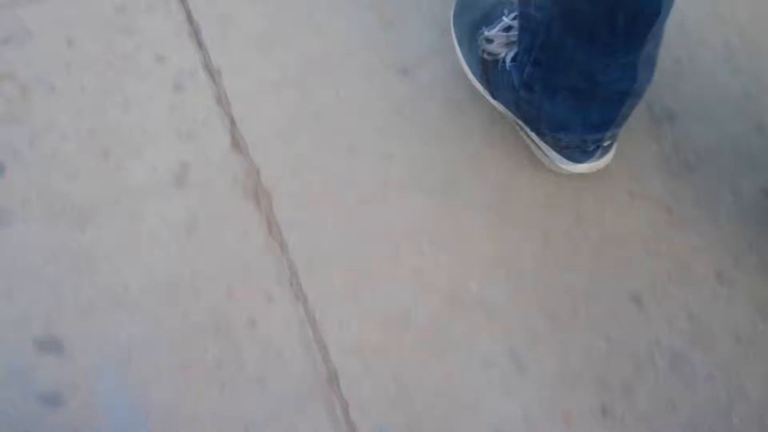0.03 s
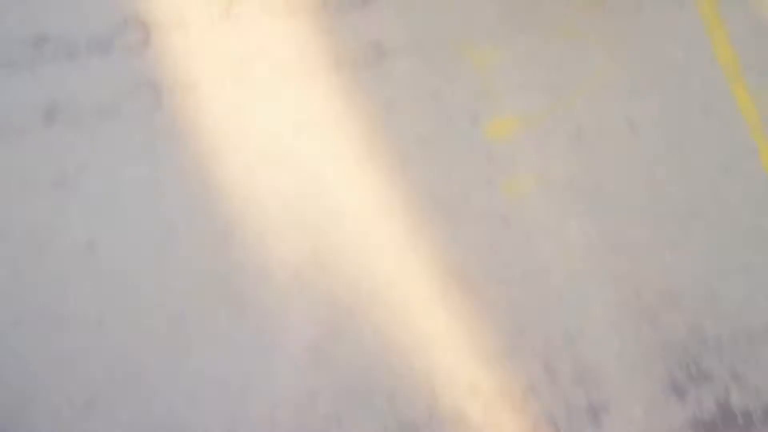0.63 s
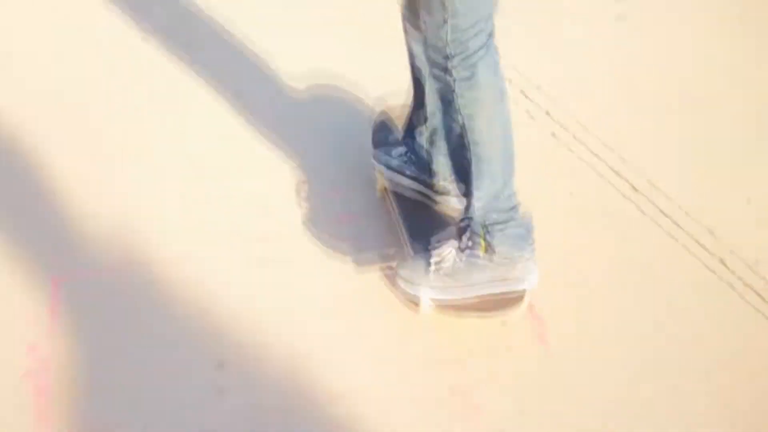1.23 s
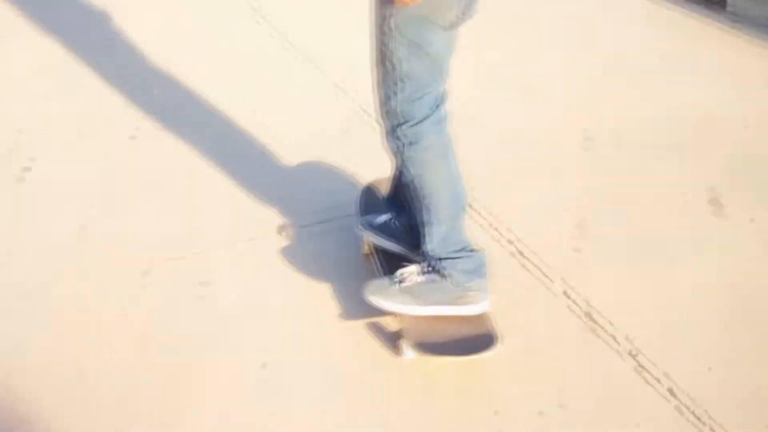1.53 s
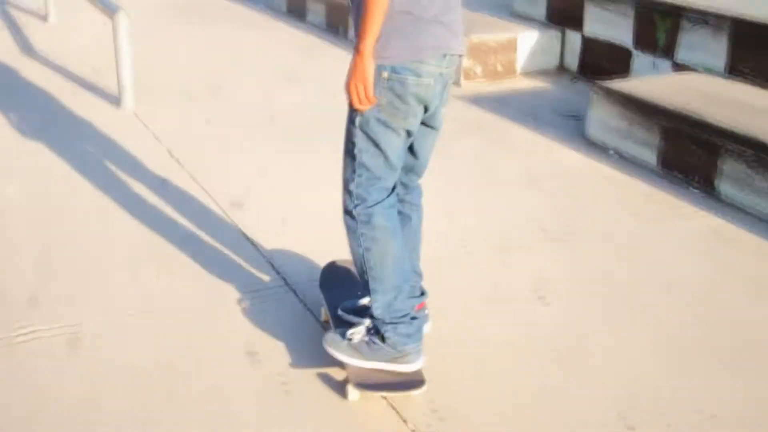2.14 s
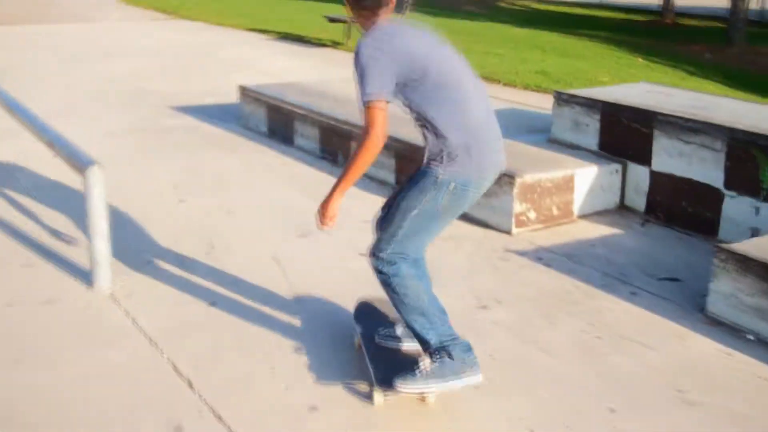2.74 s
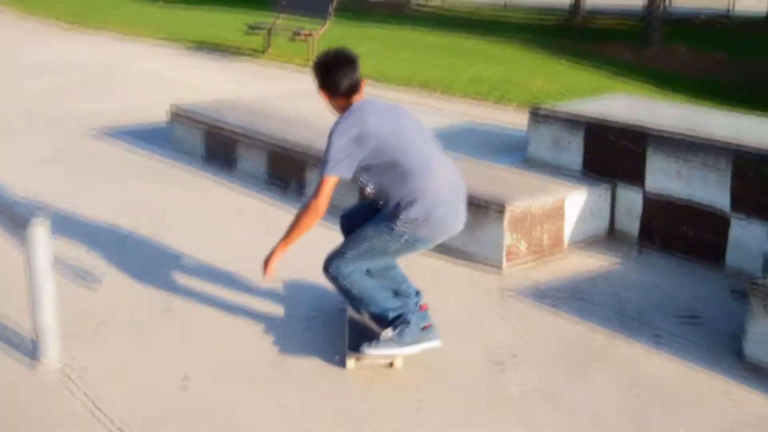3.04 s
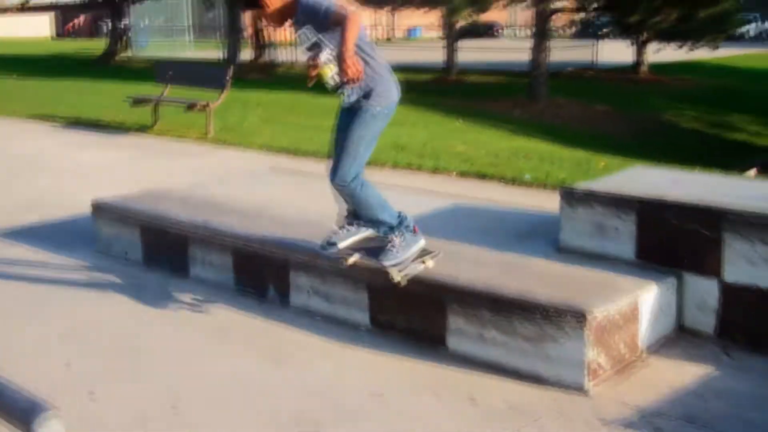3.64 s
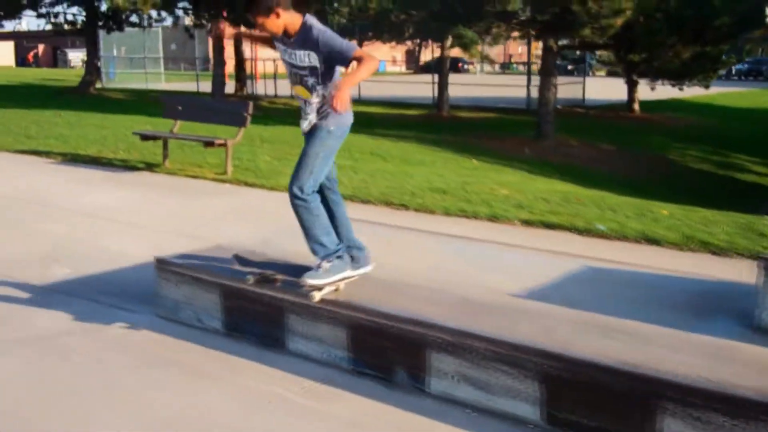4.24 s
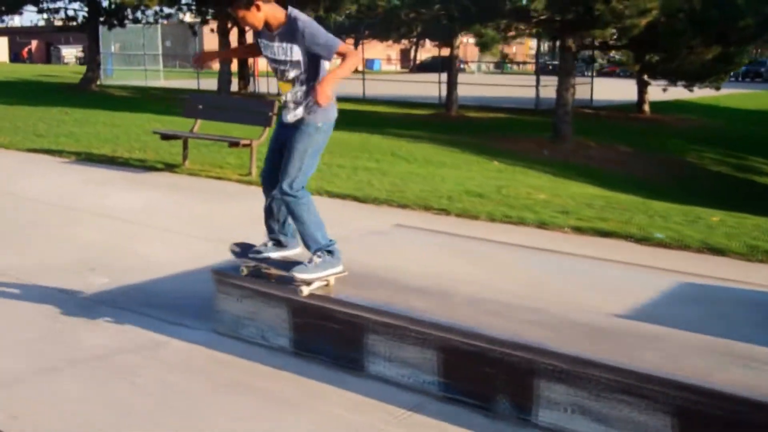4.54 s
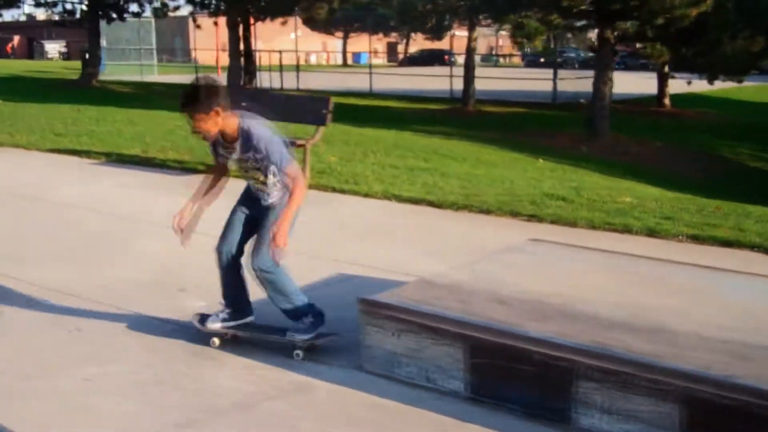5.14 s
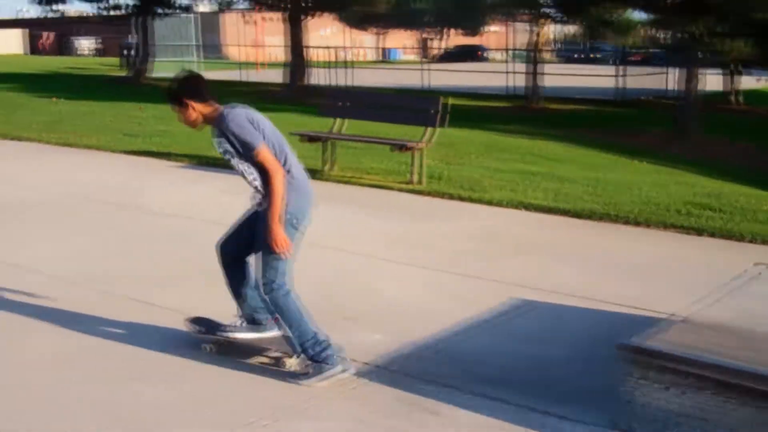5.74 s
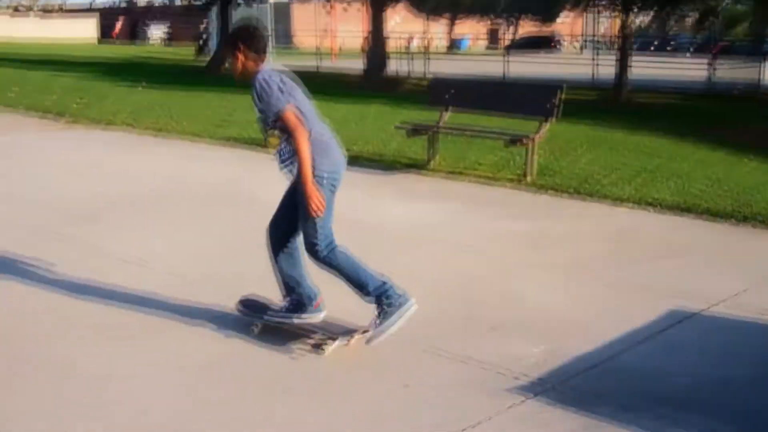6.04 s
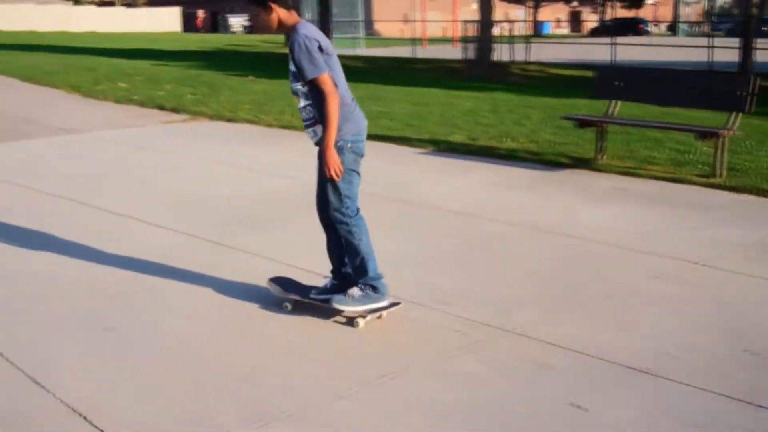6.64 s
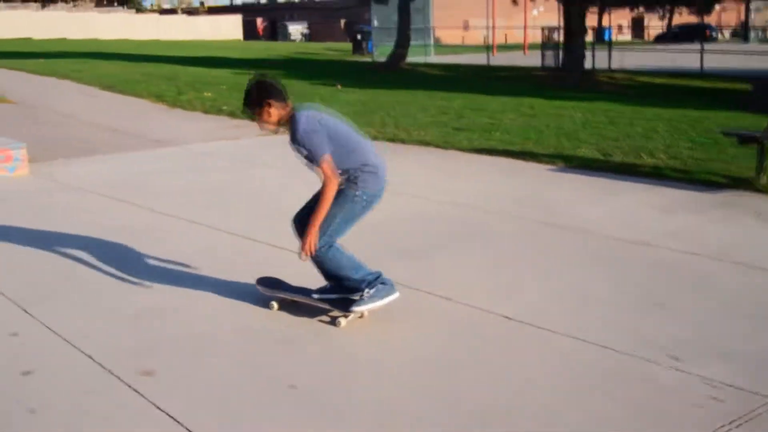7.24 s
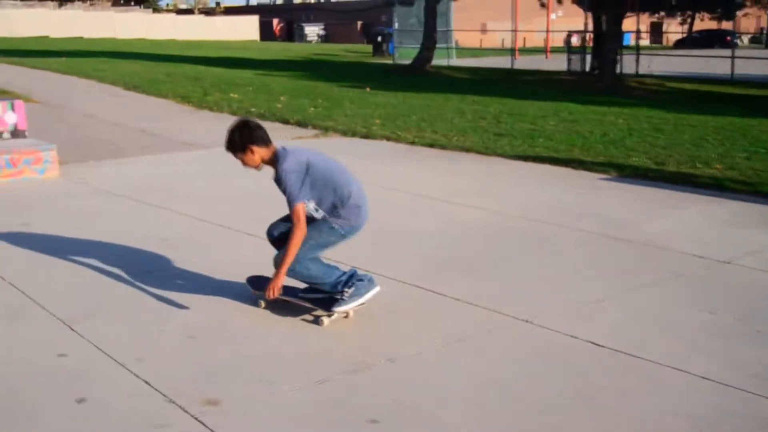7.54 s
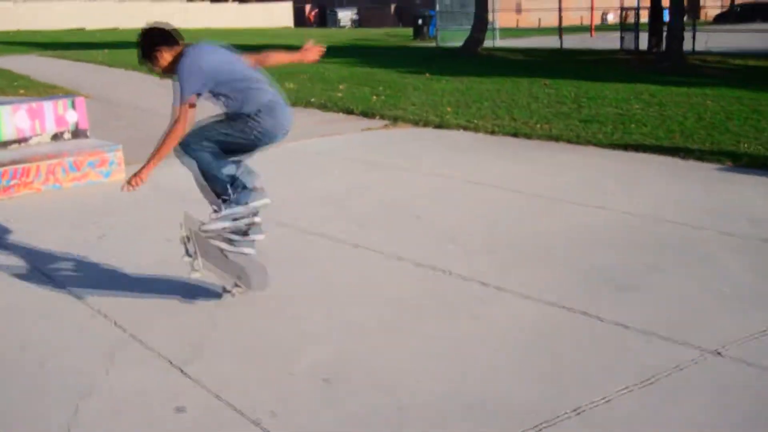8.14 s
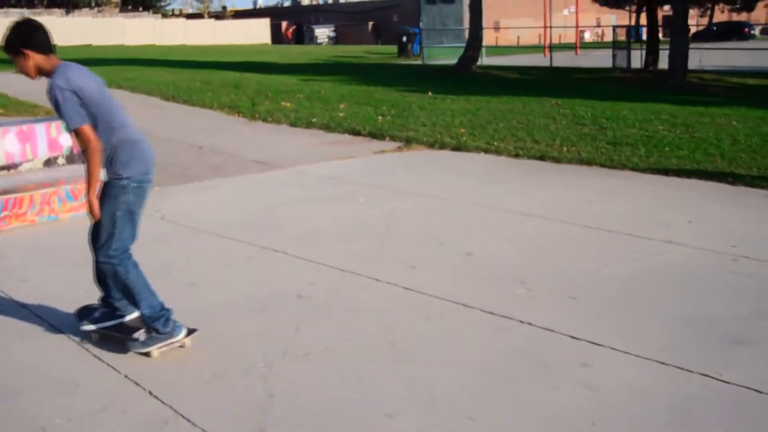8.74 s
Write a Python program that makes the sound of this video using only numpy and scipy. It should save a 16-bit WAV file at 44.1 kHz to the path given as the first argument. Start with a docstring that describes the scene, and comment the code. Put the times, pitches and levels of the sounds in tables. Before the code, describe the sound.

A skateboard clatters down onto concrete and rolls off with a hollow, gritty rumble, clicking over joints. It pops and smacks onto a ledge, the metal trucks scrape briefly, and it drops off with a loud clack. More rolling leads to another pop and a hard landing. The microphone follows close beside it outdoors, with a faint low rumble of air.

```python
"""An outdoor skate spot with smooth concrete and a ledge, heard from close beside a moving skateboard.
The board is set down, rolls over joints, pops onto the ledge, grinds, drops off, is pushed and flipped.
The grain of the concrete shakes deck and trucks into rumble and rattle; hard contacts clack the plywood.
Bearings sing, soles scuff, and air rumbles past the handheld microphone.
A gain control ducks after every hard clack and swells back."""
import sys
import numpy as np
from scipy import signal
from scipy.fft import rfft, irfft, next_fast_len
from scipy.io import wavfile
from scipy.ndimage import minimum_filter1d

SR = 44100
rng = np.random.default_rng(int(sys.argv[2]) if len(sys.argv) > 2 else 0)


def wav_record(signal):
    """Record a signal, one row per channel, as 16-bit PCM in the file named by sys.argv[1]."""
    frames = np.transpose(np.atleast_2d(signal))
    bounded = np.clip(frames, -1, 1)
    # unit amplitude maps onto the largest positive 16-bit level
    quanta = np.round(bounded * 32767).astype(np.int16)
    wavfile.write(sys.argv[1], SR, quanta)


N = 392490
TIME = np.arange(N) / SR
FADE_IN = np.clip((TIME - .155) / .02, 0, 1)

# Air flowing past the microphone. Each row: time in seconds, level in dB.
BREEZE_LEVELS = [(.2, -67), (.8, -56), (1.3, -70), (1.9, -54.5), (3.4, -53), (4.2, -56), (6.2, -57),
                 (7.2, -62), (8.89, -52)]
# Tone curves of the air, the wheel hiss and a clack's crack. Each row: frequency in Hz, gain in dB.
AIR_EQ = [(15, -6), (30, -8), (60, -6.5), (100, -9.5), (200, -24), (500, -73)]
HISS_EQ = [(1800, -32.5), (2500, 1.5), (3000, 0), (3600, 4), (5000, -1), (7000, -5.5), (9500, -10),
           (11000, -13), (12500, -24), (15000, -53)]
CRACK_EQ = [(1500, -26), (2700, 1), (4000, 5), (5000, -1.5), (7000, -4), (9500, -10.5), (11500, -16),
            (15000, -36)]
# A bearing whistles; a spinning wheel rings its axle. Each row: start and end in seconds, level in dB.
WHISTLES = [(1.97, 2.11, -60), (2.4, 2.7, -58), (2.72, 2.82, -53.5), (3.14, 3.19, -58)]
WHEEL_SPINS = [(.18, .22, -59), (4.65, 5.14, -51), (5.5, 7.0, -57)]
# A sole scuffs ground or grip tape. Each row: centre in seconds, level in dB, half length in seconds.
SOLE_SCUFFS = [(0.197, -47, 0.0042), (5.574, -37.5, 0.0082), (5.914, -44.5, 0.039)]
# Truck metal scraping along the ledge. Each row: time in seconds, level in dB.
GRIND_LEVELS = [(3.98, -80), (4.045, -39), (4.1, -40), (4.13, -59), (4.17, -40.5), (4.33, -38.5),
                (4.43, -44), (4.58, -97)]

# The board's resonances. Each row: frequency in Hz, width in Hz, gain in dB.
SPINNING_AXLE_MODES = [(3300, 55, 0), (3520, 90, -3)]
GRIND_MODES = [(1870, 140, -5), (2290, 170, 1), (3570, 370, 1), (5240, 500, -11), (6700, 800, -14),
               (9500, 800, -17)]   # truck metal, damped by the rider's weight
DECK_MODES = [(134.6, 76, -11.5), (246.6, 74, -4), (340, 81.6, -1.5), (488, 97.5, 0), (669, 186, -1)]   # the loaded wooden deck
TRUCK_MODES = [(1093, 182, 2), (1383, 106, 4), (1494, 292, -1.5), (2480, 880, -12)]   # trucks and wheels
HARDWARE_MODES = [(1525, 69, 5), (1935, 120, 7), (2653, 48, 7.5), (3220, 84, 4.5), (4020, 220, -4.5)]   # axles, washers and bearings
PLYWOOD_MODES = [(1138, 170, 14), (1514, 246, 13), (1947, 410, 9.5), (2306, 300, 6.5), (3240, 890, -6)]   # the brief ring under a hard blow

# Deck rumble, riding speed and nearness. Each row: time in seconds, level in dB.
RUMBLE_LEVELS = [(.17, -49), (.6, -47), (.75, -36.5), (1.0, -41), (1.1, -40), (1.17, -35), (2.0, -34.5),
                 (2.33, -30), (2.6, -33), (2.9, -34), (3.35, -29.5), (3.65, -39), (3.92, -38.5),
                 (4.08, -33.5), (4.5, -35.5), (4.75, -31), (5.12, -32.5), (5.45, -30), (6.1, -35.5),
                 (6.6, -36.5), (6.88, -31), (7.2, -39.5), (7.45, -39), (7.75, -34.5), (7.93, -37.5),
                 (8.1, -34), (8.89, -37)]
# The top end of the roll. Each row: time in seconds, wheel hiss and truck rattle in dB over the rumble.
TREBLE_LEVELS = [(.2, -7, -1.5), (1.2, -12.5, -4.5), (1.8, -11, -2), (2.6, -13, -6), (3.3, -11.5, -5.5),
                 (4.1, -8, -4), (4.6, -17, -8), (5.15, -18.5, -6.5), (5.6, -9, -7), (6.1, -17, -6.5),
                 (6.9, -12, -7), (7.6, -11.5, -7.5), (8.89, -11.5, -4)]
# Two hollow wheel drones that follow the rider's shifting weight.
# Each row: time in seconds, lower and upper drone in dB over the rumble.
DRONE_LEVELS = [(.2, -6, 2), (1.5, -10, -26), (2.199, -8, -8), (3.3, -24, -10), (4.2, -11, -7),
                (4.95, -7, -7), (5.7, -12, -2.5), (6.3, -2.5, -3), (6.95, 0, -3), (7.7, -10.5, -7),
                (8.15, -11, -8), (8.89, -16, -3)]
# Wheels slip sideways in a turn. Each row: centre in seconds, extra hiss in dB, half length in seconds.
WHEEL_SKIDS = [(2.34, 3.5, 0.04), (4.27, 2, 0.076), (6.38, 6.5, 0.11), (7.095, 9, 0.059), (7.83, 8, 0.027)]
# Pitched blows from wheels, feet, tail and slab joints.
# Each row: start in seconds, peak in dB, pitch in Hz, rise in seconds.
KNOCK_HITS = [(0.4715, -5, 1170, 0.0017), (0.515, -26, 970, .002), (0.525, -18, 1000, 0.0027),
              (0.8478, -10, 1140, .002), (1.1589, -14.5, 845, 0.00083), (1.361, -15, 755, 0.00084),
              (1.4342, -17, 450, 0.0014), (2.56, -19, 474, 0.0015), (2.5633, -7.5, 520, 0.0012),
              (2.7616, -15.5, 450, 0.00073), (2.7639, -10.5, 574, .0015), (3.4624, -11.5, 560, 0.0016),
              (3.6915, 14, 1870, .0006), (4.5704, -18, 1750, 0.00065), (4.585, 6, 2220, 0.00027),
              (4.915, -10, 420, 0.0012), (5.189, 6, 2130, 0.002), (5.1902, 12, 1180, 0.0019),
              (5.699, -12.5, 496, 0.0021), (5.7, -11.5, 1070, 0.0021), (5.9537, -6.5, 390, 0.0012),
              (6.4832, -5, 620, 0.00086), (7.238, -7, 520, 0.0016), (7.2381, -8, 890, 0.0011),
              (7.5345, -14, 400, 0.00093), (7.543, -13, 400, 0.0011), (7.9721, -4, 2420, 0.00033),
              (8.74, -15.5, 362, 0.0014)]
# Hard contacts of tail, trucks and wheels; the biggest are the landings near 3.7, 5.2 and 8.3 seconds.
# Each row: start in seconds, plywood level in dB, deck boom and treble crack in dB over the plywood.
CLACK_HITS = [(0.23, -24.5, -5.5, -6.5), (0.3133, -33, 0.5, -4), (0.3733, -36.5, -0.5, -4.5),
              (.448, -37.5, 4, -3.5), (0.4693, -23, -5.5, -5), (0.5151, -32, -7, -8), (0.525, -31, 1, -5),
              (0.838, -35, 1, -4.5), (0.8465, -29, -12, -3.5), (0.87, -32, 2, -15), (0.973, -37, -4, -3),
              (2.353, -21, -5, -9.5), (2.365, -31, -2, -3), (2.497, -31.5, 4, -4), (2.5625, -30.5, -4, -12),
              (2.764, -29.5, -4, -10), (2.78, -36.5, -21, -0.5), (3.4957, -15, -8.5, 0),
              (3.575, -45, -10, 2), (3.684, -35, 15.5, 4), (3.691, -4.5, -7, -4), (3.7522, -22, -10, -1),
              (3.797, -25, 7, 9), (4.324, -42.5, -1, 2), (4.419, -42.5, -5, 2.5), (4.571, -29, -5, -3.5),
              (4.585, -14.5, -2, -0.5), (4.601, -29, -20, -3), (4.687, -34.5, 2, -7.5),
              (4.9146, -29, 1.5, -12.5), (5.139, -39, 4, 1), (5.163, -37.5, 3.5, -2),
              (5.1898, -1.5, -4, -2.5), (5.1985, -9.5, -7, -5), (5.258, -25, -4, -3), (5.423, -35, 3, 1.5),
              (5.766, -39.5, -8, 4.5), (6.277, -44.5, -1, 6), (6.316, -34.5, 3.5, 0.5),
              (6.329, -38, -17, -4), (6.437, -44.5, -7, 5), (6.48, -36, -3, 2), (6.485, -29.5, -6, 0),
              (7.087, -35.5, 4.5, -1), (7.119, -41.5, -6, 4), (7.189, -41, -20, 0.5),
              (7.239, -27, -8, -10.5), (7.9414, -18, -10, 1), (7.951, -30, -7, 1), (7.9732, -25, -14, -5),
              (8.239, -37, -9, 0.5), (8.2831, -21, -10, -4), (8.3163, -24.5, -26, -9),
              (8.3267, -29, -29, 4), (8.33, 0, -12.5, -6.5), (8.336, -10, -4, -4), (8.342, -19, -9, -13),
              (8.358, -38, -7, -22), (8.594, -30.5, -3, -0.5)]

# Stereo image of the two microphone ports. Each row: frequency in Hz, likeness from 0 to 1.
PORT_LIKENESS = [(25, .1), (60, 0.65), (130, 0.99), (400, 1), (2000, 0.97), (4000, 0.81), (7000, 0.79),
                 (10000, 0.96), (13000, 0.27)]
# Their balance. Each row: frequency in Hz, left minus right in dB.
PORT_BALANCE = [(500, 0), (2000, 1), (4000, 2), (5500, 7), (7500, 9), (9500, 12), (11500, 6), (13000, 0),
                (15000, 4)]
# Their phase offset. Each row: frequency in Hz, lead of the left side in radians.
PORT_LEAD = [(200, -0.127), (2500, 0.37), (4000, -0.45), (5500, 1), (7000, 0.25), (9000, 1), (11000, -1.7),
             (13000, -0.79)]


def from_db(db):
    """Decibels to gain."""
    return 10 ** (np.asarray(db) / 20)


def rms_one(x):
    """Scale to unit rms."""
    return x / np.sqrt(np.mean(x ** 2) + 1e-20)


def automation(rows):
    """One curve for each column after the first, which gives the time in seconds."""
    times, *columns = np.transpose(rows)
    return [np.interp(TIME, times, column) for column in columns]


def swells(rows):
    """Bell-shaped rises. Each row: centre in seconds, height, half length in seconds."""
    return sum(height * np.exp(-.5 * ((TIME - centre) / half) ** 2) for centre, height, half in rows)


def gates(rows, fade_s):
    """Gain that fades in, holds and fades out. Each row: start and end in seconds, level in dB."""
    return sum(from_db(db) * np.interp(TIME, [start - fade_s, start, end, end + fade_s], [0, 1, 1, 0])
               for start, end, db in rows)


def drift(rate):
    """A smooth random wobble of unit rms that turns about rate times a second."""
    return rms_one(np.interp(TIME * rate, np.arange(4000), rng.standard_normal(4000)))


def per_bin(points, size):
    """A curve over frequency, read at the FFT bins of a signal of this size."""
    hz, value = np.transpose(points)
    return np.interp(np.log(np.fft.rfftfreq(size, 1 / SR) + 1), np.log(hz), value)


def cut(x, hz, kind, order=2):
    """Butterworth filter."""
    return signal.sosfilt(signal.butter(order, hz, kind, fs=SR, output="sos"), x)


def equalise(x, curve):
    """Minimum-phase EQ: nothing rings ahead of an attack."""
    cepstrum = irfft(np.log(from_db(per_bin(curve, size=4096))))
    half = len(cepstrum) // 2
    cepstrum[1:half] *= 2
    cepstrum[half + 1:] = 0
    impulse = irfft(np.exp(rfft(cepstrum)))
    return signal.fftconvolve(x, impulse[None], axes=1)[:, :x.shape[1]]


def resonate(x, modes):
    """Parallel resonances of alternating polarity."""
    out = 0
    for k, (hz, width, db) in enumerate(modes):
        r = np.exp(-np.pi * width / SR)
        poles = [1, -2 * r * np.cos(2 * np.pi * hz / SR), r * r]
        ring = signal.lfilter([1, 0, -1], poles, x + 1e-18)
        out = out + (-1) ** k * from_db(db) * (1 - r * r) / 2 * ring
    return out


def two_ports(pair):
    """Two unrelated signals become left and right: near mono in the mids, wider at both extremes."""
    size = next_fast_len(N)
    mid, side = rfft(pair, size)
    alike = np.clip(per_bin(PORT_LIKENESS, size), 0, 1)
    return irfft(np.sqrt(1 + alike) * mid + np.sqrt(1 - alike) * side * [[1], [-1]], size)[:, :N]


def grains(per_s, spread_db):
    """A stereo bed of tiny random impacts of uneven size."""
    sizes = from_db(spread_db * np.minimum(rng.exponential(1, N), 4))
    hits = rng.random(N) < per_s / SR
    return rms_one(two_ports(sizes * hits * rng.standard_normal((2, N))))


def breeze(gust_db=2.0):
    """Air flows past the moving microphone as a low, unsteady rumble."""
    level_db = automation(BREEZE_LEVELS)[0] + gust_db * drift(9)
    return from_db(level_db) * rms_one(equalise(two_ports(rng.standard_normal((2, N))), AIR_EQ))


def park_reverb(x, wet_db=-22, t60=0.036, dull_hz=4500, far_db=-40, far_t60=1.0):
    """Slab and ledges add a short, dull tail; trees and buildings a faint, longer one."""
    t = TIME[:SR // 2]
    scatter = cut(two_ports(rng.standard_normal((2, N)))[:, :len(t)], dull_hz, "low", order=1)
    tail = scatter * (from_db(-60 * t / t60) + from_db(far_db - 60 * t / far_t60)) * (t > .008)
    tail /= np.sqrt(np.sum(tail[0] ** 2))
    return x + from_db(wet_db) * signal.fftconvolve(x, tail, axes=1)[:, :N]


def bearing_whistle(hz=5940, waver_hz=10, flutter_db=1.8):
    """Now and then a bearing gives a thin, wavering whistle."""
    phase = 2 * np.pi * np.cumsum(hz + waver_hz * drift(13)) / SR
    level = gates(WHISTLES, fade_s=0.036) * from_db(flutter_db * drift(24.9))
    return level * np.sqrt(2) * np.sin(phase)


def spinning_wheel():
    """The balls of a bearing tick against the axle and keep it singing."""
    ticks = grains(per_s=1600, spread_db=1)
    return gates(WHEEL_SPINS, fade_s=0.03) * rms_one(resonate(ticks, SPINNING_AXLE_MODES))


def scuffs(hz=6000, width_hz=3000):
    """Rubber dragged over grit: a short, bright swish."""
    strokes = swells([(centre, from_db(db), half) for centre, db, half in SOLE_SCUFFS])
    swish = resonate(grains(per_s=8000, spread_db=1.8), [(hz, width_hz, 0)])
    return strokes * rms_one(cut(swish, 11300, "low", order=4))


def grind(catch_db=4.0):
    """Metal catches and slips on the ledge in uneven bursts that keep the truck ringing."""
    level_db, = automation(GRIND_LEVELS)
    slips = grains(per_s=3000, spread_db=2.6) * from_db(catch_db * drift(90))
    return from_db(level_db) * rms_one(resonate(slips, GRIND_MODES))


def deck(force):
    """The hollow wooden voice of the board."""
    return cut(resonate(force, DECK_MODES), 1023, "low", order=4)


def trucks(force):
    """The harder ring of axles and wheels."""
    return cut(resonate(force, TRUCK_MODES), [900, 3100], "band", order=3)


def wheel_drone(force, hz, width_hz=124, wander=0.024):
    """A hollow wheel resonance whose pitch strays a little, at unit rms."""
    carrier = np.exp(2j * np.pi * np.cumsum(hz * (1 + wander * drift(12))) / SR)
    r = np.exp(-np.pi * width_hz / SR)
    envelope = signal.lfilter([1], [1, -2 * r, r * r], force / carrier)
    return rms_one(np.real(carrier * envelope))


def loose_hardware(force, loose_db=2.5):
    """Axles, washers and bearings ring by turns, each in its own time, at unit rms overall."""
    return rms_one(sum(from_db(loose_db * drift(30)) * resonate(force, [mode])
                       for mode in HARDWARE_MODES))


def rolling(drone_hz=(557.5, 706), hardware_db=-4, skid_rattle_share=0.5):
    """Wheels run over the grain of the concrete; rough patches shake deck, wheels and trucks at once."""
    rumble_db, = automation(RUMBLE_LEVELS)
    hiss_db, rattle_db = rumble_db + np.array(automation(TREBLE_LEVELS))
    skid_db = swells(WHEEL_SKIDS)
    hiss_db += skid_db
    rattle_db += skid_rattle_share * skid_db
    patches_db, flutter_db = 0.77 * drift(22), 0.42 * drift(110)
    grit_db = (0.97 + 0.3 * skid_db) * drift(350)   # skids are grittier as well as brighter
    rumble = from_db(rumble_db) * rms_one(deck(grains(per_s=2500, spread_db=1.87)))
    tread, pebbles = rng.standard_normal(N), grains(per_s=900, spread_db=3.3)
    drone = sum(from_db(rumble_db + db) * wheel_drone(tread, hz)
                for hz, db in zip(drone_hz, automation(DRONE_LEVELS)))
    rattle = from_db(rattle_db + flutter_db) * rms_one(trucks(grains(per_s=4000, spread_db=0.86)))
    fine_grain = grains(per_s=9000, spread_db=0.2)
    hiss = from_db(hiss_db + flutter_db + grit_db) * rms_one(equalise(fine_grain, HISS_EQ))
    ring = from_db(hiss_db + hardware_db) * loose_hardware(pebbles)
    return from_db(patches_db) * (rumble + drone + rattle + hiss + ring)


def knocks(body_db=-12, low_cut_hz=110):
    """A blow swells and dies in a few cycles, the harder the contact the sooner, and rings the deck."""
    blows, t = np.zeros(N), TIME[:SR // 20]
    for start_s, db, hz, rise_s in KNOCK_HITS:
        start = round(start_s * SR)
        swell = (t / rise_s * np.exp(1 - t / rise_s)) ** 2
        blows[start:start + len(t)] += from_db(db) * swell * np.sin(2 * np.pi * hz * t)
    return cut(blows + from_db(body_db) * deck(blows), low_cut_hz, "high")


def plywood(force, boom_db, tilt=0.91, spread_db=1.5, detune=.015):
    """The plywood rings with a pitch and strength that depend on where it is struck."""
    hz, width, db = np.transpose(PLYWOOD_MODES)
    pitch_offset, level_offset = rng.standard_normal((2, len(hz)))
    tilt_db = -tilt * boom_db * np.log2(hz / hz[0])   # a drier blow rings brighter
    modes = zip(hz * (1 + detune * pitch_offset), width, db + spread_db * level_offset + tilt_db)
    return cut(resonate(force, modes), [900, 4200], "band")


def clacks(snap=1.56, wood_snap=0.9, rise_s=0.00043, rattle_db=-23, rattle_t60=0.18, loose_share=0.14):
    """Each contact is a blunt snap and a dense smack, then a sparse, dying rattle of loose hardware."""
    out, t = np.zeros((2, N)), TIME[:SR // 7]
    chatter = grains(per_s=7000, spread_db=1.8)
    hardware = rms_one(chatter * (rng.random(N) < loose_share))
    impact = np.exp(-((t - rise_s) / 6e-5) ** 2)
    for start_s, wood_db, boom_db, crack_db in CLACK_HITS:
        start = round(start_s * SR)
        span = slice(start, start + len(t))
        smack_t60 = 0.074 * 2 ** (boom_db / 7)   # 7 dB more boom chatters twice as long
        smack = chatter[:, span] * from_db(-60 * t / smack_t60)
        rattle = hardware[:, span] * from_db(rattle_db - 60 * t / rattle_t60)
        force = (smack + rattle) * (1 - np.exp(-t / rise_s)) + snap * impact
        wood = plywood(force + wood_snap * impact, boom_db)
        for layer, db in [(deck(force), boom_db), (wood, 0), (equalise(force, CRACK_EQ), crack_db)]:
            attack_rms = np.sqrt(np.mean(layer[:, :SR // 50] ** 2))   # the first 20 ms set the level
            out[:, span] += from_db(wood_db + db) * layer / attack_rms
    return out


def gain_control(x, threshold_db=-26, hold_s=0.15, release_s=0.22, average_s=0.0055, ahead_s=0.00227):
    """A loud blow ducks the gain at once; it stays down for a moment, then swells back."""
    sidechain = cut(x.mean(axis=0), (600, 7000), "band", order=1)
    pole = np.exp(-1 / (average_s * SR))
    power = signal.lfilter([1 - pole], [1, -pole], sidechain ** 2)
    over_db = np.maximum(10 * np.log10(power + 1e-12) - threshold_db, 1e-6)
    half = int(hold_s * SR / 2)
    held_db = -minimum_filter1d(-over_db, 2 * half + 1, origin=half)
    release = TIME / release_s
    duck_db = np.exp(np.maximum.accumulate(np.log(held_db) + release) - release)
    return x * from_db(-np.interp(TIME + ahead_s, TIME, duck_db))


def scene():
    """The board in its outdoor reverb, over a bed of moving air."""
    air = breeze()
    board = rolling() + clacks() + knocks() + grind() + scuffs() + bearing_whistle() + spinning_wheel()
    return (park_reverb(board) + air) * FADE_IN


def record(dry, ceiling=0.28, self_noise_db=-72, top_hz=15200):
    """Ducking, left-right colour from the ports, a faint steady hiss, soft clipping and a top cut."""
    size = next_fast_len(N + SR // 10)
    split = np.array([[.5], [-.5]])   # half to each side, in opposite directions
    balance = from_db(split * per_bin(PORT_BALANCE, size))
    phase = np.exp(1j * split * per_bin(PORT_LEAD, size))
    self_noise = from_db(self_noise_db) * FADE_IN * cut(rng.standard_normal((2, N)), 6900, "low")
    heard = irfft(rfft(gain_control(dry), size) * balance * phase, size)[:, :N] + self_noise
    rounded = ceiling * np.tanh(heard / ceiling)
    return signal.sosfilt(signal.ellip(10, .1, 80, top_hz, fs=SR, output="sos"), rounded)


dry = scene()
out = record(dry)
wav_record(out)
```